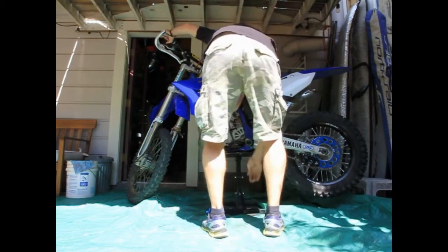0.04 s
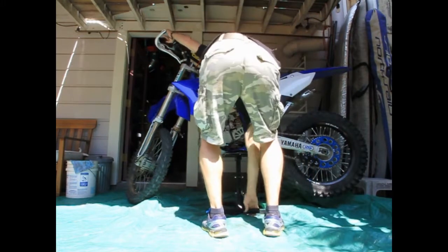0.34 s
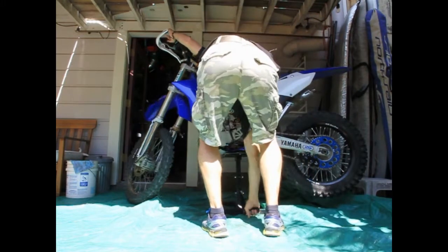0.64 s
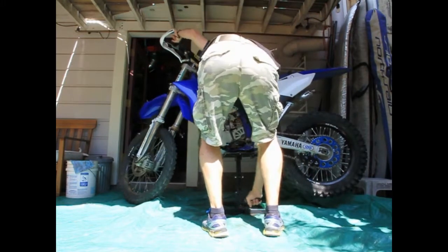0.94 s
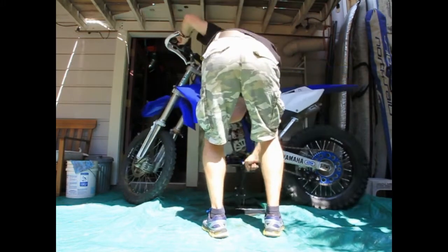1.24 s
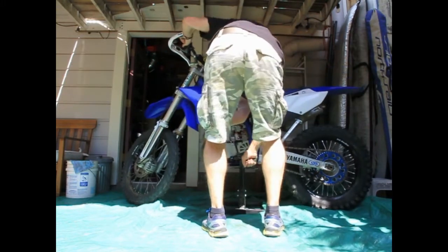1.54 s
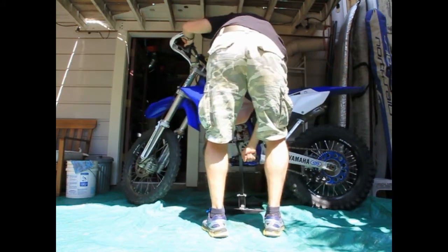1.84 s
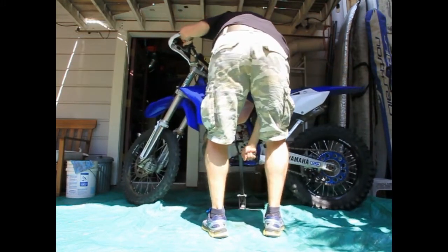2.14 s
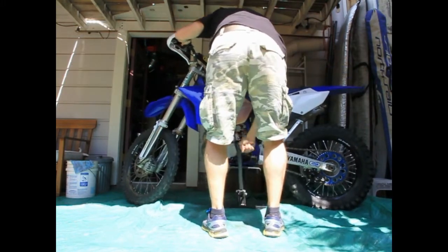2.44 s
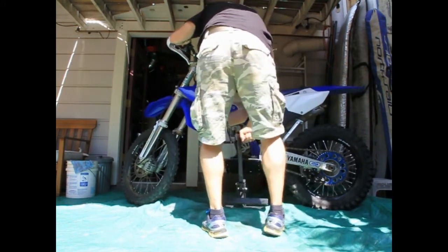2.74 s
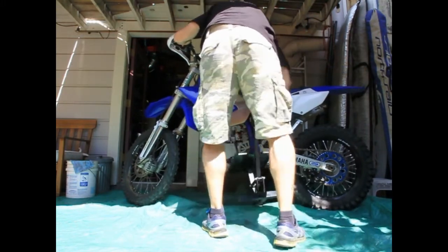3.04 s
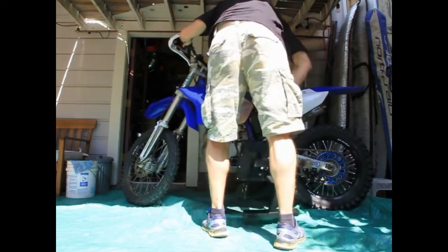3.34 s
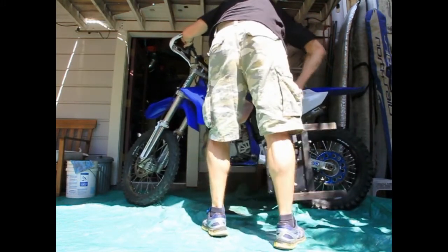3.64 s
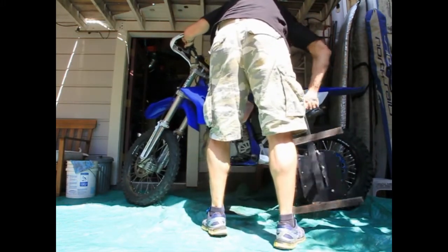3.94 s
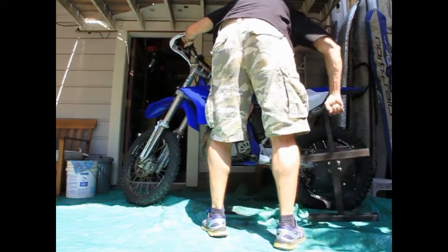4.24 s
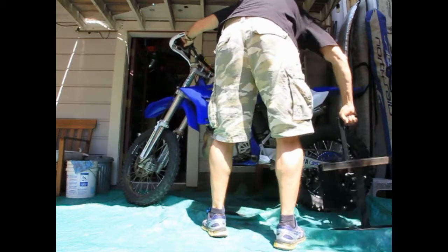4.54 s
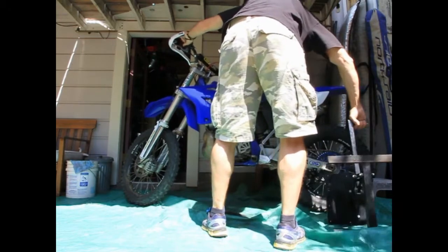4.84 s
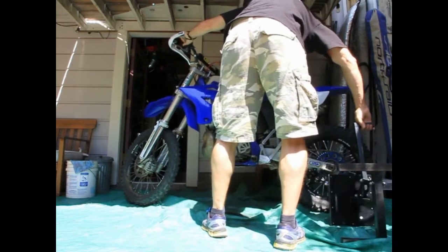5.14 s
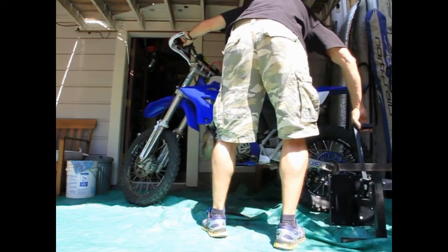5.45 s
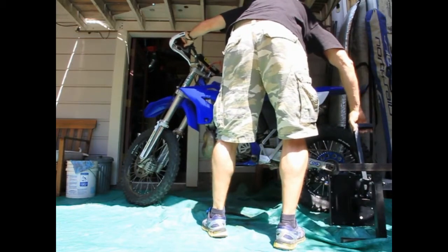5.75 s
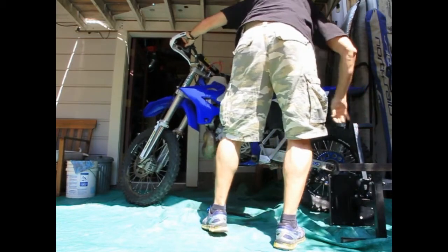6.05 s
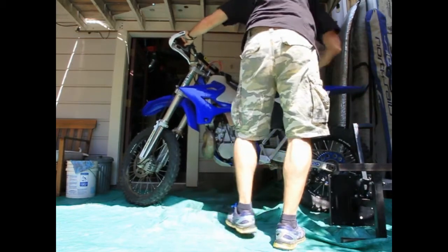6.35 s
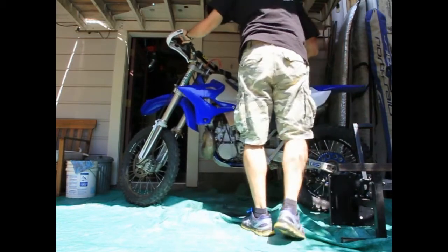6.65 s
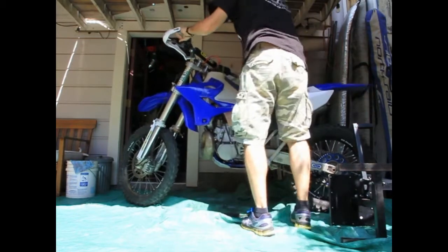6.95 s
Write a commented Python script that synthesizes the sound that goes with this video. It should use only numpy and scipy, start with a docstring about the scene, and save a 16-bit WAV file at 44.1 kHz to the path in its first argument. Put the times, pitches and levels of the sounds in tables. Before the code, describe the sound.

A metal stand clunks and clanks as it is dragged over a plastic tarp and set down, followed by shuffling steps.

```python
"""A steel lift stand is lowered under a dirt bike, dragged out over a plastic tarp, swung aside, set down.
Impacts excite the modes of its frame and loose linkage, which reverberate under a porch roof.
Sliding friction makes its feet scrape and briefly squeal; the tarp hisses and its creases snap.
Shoes then shuffle on the tarp. Throughout, far traffic murmurs; early on there is a steady background
hiss, a distant engine drones at its firing harmonics and a small bird chirps faintly."""
import sys
import numpy as np
from scipy import signal
from scipy.fft import rfft, irfft, next_fast_len
from scipy.io import wavfile
from scipy.ndimage import uniform_filter1d, map_coordinates

SR = 44100
rng = np.random.default_rng(int(sys.argv[2]) if len(sys.argv) > 2 else 0)


def unload_audio(sound):
    """Save the sound as a 16-bit wav file, at the path given as the first command line argument."""
    columns = np.transpose(np.atleast_2d(sound))
    # keep every value between -1 and 1, then stretch to whole-number steps
    steps = np.round(np.clip(columns, -1, 1) * 32767)
    wavfile.write(sys.argv[1], SR, steps.astype(np.int16))


N = 317608
TOP_HZ = 15900
# Spectrum of the hiss, of tarp and background alike. Each row: frequency in Hz, relative level in dB.
HISS_SPECTRUM = [(800, -29), (2000, 3.5), (4000, 9), (7000, 2.5), (13000, 6.5), (16000, -2.5)]


def amp(db):
    """Decibels as an amplitude ratio."""
    return 10 ** (np.asarray(db) / 20)


def unit(x):
    """Normalisation to rms 1."""
    return x / np.sqrt(np.mean(x ** 2) + 1e-20)


def along(points, hz):
    """Interpolation of (Hz, value) points on a logarithmic frequency axis."""
    f, v = np.transpose(points)
    return np.interp(np.log(hz + 1), np.log(f + 1), v)


def curves(rows):
    """Linear interpolation in time: one value per sample for each column after the first."""
    times, *columns = np.transpose(rows)
    return [np.interp(np.arange(N) / SR, times, column) for column in columns]


def during(rows, fade):
    """A gate: 1 within a table's time span, fading to 0 outside it."""
    t = np.arange(N) / SR
    return np.clip(1 + np.minimum(t - rows[0][0], rows[-1][0] - t) / fade, 0, 1)


def wobble(rate):
    """Smooth random modulation with `rate` knots a second."""
    return map_coordinates(rng.standard_normal(int(N * rate / SR) + 4), [np.arange(N) * rate / SR])


def colour(x, spectrum):
    """Spectral shaping by (Hz, dB) points, at rms 1."""
    size = next_fast_len(len(x) + 2048)
    gain = amp(along(spectrum, np.fft.rfftfreq(size, 1 / SR)))
    return unit(irfft(rfft(x, size) * gain, size)[:len(x)])


def add(track, start, sound):
    """Superposition of a sound on the track, from `start` seconds."""
    part = track[max(round(start * SR), 0):][:len(sound)]
    part += sound[:len(part)]


def porch(x, wet_db, build_s=0.00196):
    """Reverberation: reflections from walls and roof decay exponentially, the treble before the bass."""
    # Each row: frequency in Hz, reverberation time (t60) in seconds.
    decay_times = [(100, 0.47), (500, 0.36), (2000, 0.35), (5000, 0.26), (14000, 0.29)]
    hz, t, noise = signal.stft(rng.standard_normal(SR // 2), SR, nperseg=256)
    decay = amp(-60 * t / along(decay_times, hz)[:, None])
    tail = signal.istft(noise * decay * (1 - np.exp(-t / build_s)), SR, nperseg=256)[1]
    return x + amp(wet_db) * signal.fftconvolve(x, tail / np.linalg.norm(tail))[:len(x)]


def air(murmur_db=-47.5, swing_db=1.1):
    """Ambient noise: far traffic sums to a broadband murmur, over a low rumble that swells and ebbs."""
    # Spectra of the two noises. Each row: frequency in Hz, relative level in dB.
    murmur_spectrum = [(20, -14), (70, -30), (125, 0), (300, -5), (400, -3.5), (550, -7.5), (1100, -10.5),
                       (2260, -22), (6000, -29), (13200, -33), (16000, -40)]
    rumble_spectrum = [(15, -18), (35, -5), (55, 9), (85, 3), (120, 2), (250, -47.5)]
    # Envelope of the rumble. Each row: time in seconds, level in dB.
    rumble_levels = [(0.0, -66), (0.94, -58), (1.12, -48.5), (3.61, -59), (4.21, -51), (5.13, -53),
                     (5.73, -56), (6.24, -58), (6.58, -59), (7.2, -56)]
    rumble_db, = curves(rumble_levels)
    murmur = amp(murmur_db + swing_db * wobble(3)) * colour(rng.standard_normal(N), murmur_spectrum)
    return murmur + amp(rumble_db) * colour(rng.standard_normal(N), rumble_spectrum)


def engine(firing_hz=77.75, climb_hz_per_s=2.7, first_db=(-20, -6), third_db=(0, -13), mellow_s=1.75):
    """Periodic firing gives a harmonic series; only the lowest three carry far. It rises and mellows."""
    # Envelope of the second harmonic. Each row: time in seconds, level in dB.
    drone_levels = [(0, -48.5), (.45, -43.5), (.9, -48), (2.2, -45.5), (2.5, -52.5), (3.2, -49),
                    (3.85, -56)]
    t = np.arange(N) / SR
    drone_db, = curves(drone_levels)
    hz = firing_hz + climb_hz_per_s * t
    phase = 2 * np.pi * np.cumsum(hz * (1 + 0.008 * wobble(12.5))) / SR
    first, third = (np.interp(t, [0, mellow_s], ends) for ends in (first_db, third_db))
    harmonics_db = [first + 1.5 * wobble(4), 1.6 * wobble(27), third + 0.93 * wobble(5.9)]
    drone = sum(amp(drone_db + db) * np.sin(k * phase) for k, db in enumerate(harmonics_db, 1))
    return np.sqrt(2) * drone * during(drone_levels, fade=0.24)


def crinkle(spectrum, rate, spread_db, grain_db):
    """Granular noise: a steady rush plus `rate` random impulses a second, of scattered size."""
    clicks, count = np.zeros(N), int(rate * N / SR)
    signs = rng.choice([-1, 1], count)
    sizes = amp(spread_db * np.minimum(rng.exponential(size=count), 4))
    clicks[rng.integers(N, size=count)] = signs * sizes
    return colour(rng.standard_normal(N) + amp(grain_db) * unit(clicks), spectrum)


def hiss_and_drag(scrape_gains_db=(0, -1, 0), hiss_gains_db=(0, 3, -.5), crackle_db=-10):
    """Steady background hiss, with a faint scrape around the first clunks; then sliding friction:
    pulled free and swung aside, the stand judders over the hissing, crackling tarp."""
    # Spectra of scrape and crackle. Each row: frequency in Hz, relative level in dB.
    scrape_spectrum = [(120, -20.5), (200, 2), (300, 1.5), (450, 1.5), (680, 2), (900, -0.5), (1300, -3),
                       (2000, -7), (3300, -9), (4300, -18.5), (6500, -16), (12000, -42.5)]
    crackle_spectrum = [(1000, -13), (3000, 3), (5000, 2), (13000, 2.5), (16000, -6)]
    # Envelopes. Each row: time in seconds, scrape and hiss in dB before the span's gains.
    background = [(0, -51, -54), (.5, -52.5, -56), (.85, -51.5, -54.5), (1.14, -42.5, -56.5),
                  (1.21, -37, -46), (1.5, -47.5, -49), (1.75, -49, -59), (1.94, -49.5, -61.5)]
    pulling = [(1.99, -49.5, -58.5), (2.174, -44, -49), (2.49, -43, -47), (2.558, -34, -45),
               (2.728, -33, -34.5), (2.854, -38, -45), (2.89, -41.5, -44)]
    coming_free = [(3.12, -35, -41), (3.254, -34.5, -34), (3.32, -33, -33.5), (3.44, -46.5, -52),
                   (3.526, -51, -62), (3.55, -47.5, -62)]
    swinging = [(4.35, -51.5, -47.5), (4.44, -43.5, -43.5), (4.61, -36.5, -36), (4.69, -33, -38),
                (4.77, -44, -47), (4.88, -38, -41), (5.04, -37.5, -41.5), (5.12, -44, -47),
                (5.28, -63, -77)]
    spans = (background, np.vstack([pulling, coming_free]), swinging)
    out, flicker = np.zeros(N), wobble(60)
    scrape = amp(0.61 * flicker) * crinkle(scrape_spectrum, rate=430, spread_db=-0.5, grain_db=-6)
    hiss = amp(.5 * flicker) * crinkle(HISS_SPECTRUM, rate=4000, spread_db=2.5, grain_db=-4)
    hiss += amp(crackle_db) * crinkle(crackle_spectrum, rate=110, spread_db=3.5, grain_db=14)
    for span, scrape_gain_db, hiss_gain_db in zip(spans, scrape_gains_db, hiss_gains_db):
        scrape_db, hiss_db = curves(span)
        noise = amp(scrape_db + scrape_gain_db) * scrape + amp(hiss_db + hiss_gain_db) * hiss
        out += noise * during(span, fade=0.042)
    return out


def bird(start_s=.18, period_s=.184, length_s=0.07, start_hz=9200, end_hz=8100, flutter_hz=480):
    """Frequency modulation: random flutter makes six thin, falling chirps buzz; echoes blur them."""
    out, progress = np.zeros(N), np.linspace(0, 1, int(length_s * SR))
    for k, place in enumerate(np.linspace(-1, 1, 6)):
        flutter = unit(uniform_filter1d(rng.standard_normal(len(progress)), size=40))
        hz = start_hz + (end_hz - start_hz) * progress + flutter_hz * flutter
        chirp = np.sin(np.pi * progress) * np.sin(2 * np.pi * np.cumsum(hz) / SR)
        add(out, start_s + k * period_s, amp(-55 - 7 * place ** 2) * chirp)  # loudest in mid-phrase
    return porch(out, wet_db=-1)


def snaps(t60=0.012, gain_db=-8):
    """Buckling: single creases of the tarp flick over; the longer the crease, the lower its snap."""
    # Each row: start in seconds, relative level in dB, spectral peak in Hz.
    creases = [(0.589, -29, 4610), (0.614, -32, 5030), (0.83, -29, 10000), (3.647, -31, 4040),
               (4.1957, -36, 6000), (4.3905, -22, 8600), (4.597, -17.5, 10300), (6.6857, -28, 4040),
               (6.757, -27, 4410), (6.9798, -19, 9880), (7.088, -12, 3740), (7.0935, -16.5, 3240)]
    out, t = np.zeros(N), np.arange(SR // 20) / SR
    for start, db, hz in creases:
        spectrum = [(hz / 4, -26), (hz / 2, -7), (hz, 0), (hz * 2, -10), (hz * 4, -25)]
        add(out, start, amp(db + gain_db - 60 * t / t60) * colour(rng.standard_normal(len(t)), spectrum))
    return porch(out, wet_db=-2.0)


def ringing(hz, db, t60, t):
    """Free vibration: a sum of damped modes, each struck with a random sign, at rms 1."""
    hz, db, t60 = (np.reshape(v, (-1, 1)) for v in (hz, db, t60))
    return unit(rng.choice([-1, 1], len(hz)) @ (amp(db - 60 * t / t60) * np.sin(2 * np.pi * hz * t)))


def contacts(scatter_octaves=0.127):
    """Rebound: a blow may bounce, landing a little elsewhere each time, so its leading modes shift."""
    # Each row: start in seconds, number of contacts, their spacing in seconds, loss per rebound in dB
    # (negative grows), relative thud, knock, clank and jingle levels in dB, leading frame mode in Hz,
    # leading linkage mode in Hz, hardness as a cut-off in Hz.
    clunks = [(0.988, 4, .0125, 0.4, -24, -20.5, -37, -51, 333, 1040, 6000),
              (1.037, 2, 0.0071, 3.5, -56, -29, -31.5, -37.5, 613, 1015, 5960),
              (1.212, 1, .01, 0, -26.5, -17, -29, -39, 520, 1040, 5000),
              (1.222, 3, .0105, 1.5, -32, -20, -24.5, -34.5, 782, 1318, 10000),
              (1.254, 2, .013, 5, -25, -27, -39, -38, 143, 1170, 13000),
              (1.561, 2, .012, 9, -27, -25, -25, -23, 407, 1896, 14900),
              (1.678, 1, .01, 0, -49, -38.5, -44.5, -39, 166, 4220, 6500),
              (1.776, 1, .01, -5, -46, -60, -45.5, -54, 170, 1100, 5000),
              (1.807, 1, .01, 0, -46, -43.5, -43.5, -44.5, 150, 1910, 6460),
              (2.906, 1, .01, 0, -53, -30, -41, -62, 485, 1230, 2000),
              (2.954, 2, .0086, 1.5, -31.5, -16.5, -24.5, -28.5, 440, 1244, 15000),
              (3.001, 1, .01, 0, -26.5, -40, -32, -22, 208, 1280, 15000),
              (3.013, 1, .01, 3, -53, -24, -24, -29, 428, 1250, 15000),
              (3.09, 2, .035, -0.5, -40, -31, -39, -62, 392, 1306, 6000),
              (3.187, 1, .01, 0, -60, -55, -36, -29.5, 476, 3130, 15000),
              (3.225, 1, .01, -4, -59, -56, -30.5, -32.5, 907, 4320, 6000),
              (3.744, 1, .01, 0, -46, -37.5, -32.5, -33.5, 408, 1503, 11950),
              (4.452, 2, .011, 3, -25.5, -15, -25.5, -33.5, 618, 1354, 9500),
              (4.485, 1, .01, 0, -35, -41, -32, -35, 344, 1160, 6960),
              (4.734, 1, .01, 0, -56, -47, -33.5, -45, 830, 1474, 3000),
              (4.781, 1, .01, 0, -58, -39.5, -41.5, -62, 425, 1100, 2500),
              (4.901, 2, .009, -5, -26.5, -28.5, -34.5, -34.5, 160, 1110, 10000),
              (4.93, 3, .017, 3.5, -45, -30, -26, -27.5, 382, 1680, 10000),
              (5.08, 1, .01, 2, -17.5, -14, -24, -43, 361, 1330, 3000),
              (5.086, 2, .005, 7, -30, -19, -44, -27, 560, 1220, 12200),
              (5.123, 1, .01, 0, -30, -26.5, -52, -52, 518, 980, 9000),
              (5.322, 1, .01, 4, -43, -37, -42.5, -54, 480, 1704, 4000)]
    # A rebound shakes the loose parts most. In order: thud, knock, clank and jingle offsets in dB.
    rebound_db = (1.24, -2, 0, 4.1)
    for start, count, gap, loss_db, *levels_db, frame_hz, linkage_hz, cutoff_hz in clunks:
        yield start, levels_db, frame_hz, linkage_hz, cutoff_hz
        for k in range(1, round(count)):
            shift = 2 ** (scatter_octaves * rng.uniform(-1.2, 1, 2))
            bounce_db = np.add(levels_db, rebound_db) - k * loss_db
            yield start + k * gap, bounce_db, frame_hz * shift[0], linkage_hz * shift[1], cutoff_hz


def stand(clatter_t60=0.12, attack_s=0.0006, rattle_db=-31, trims_db=(.3, .3, .3, -1.2)):
    """Impact excitation of modes: where and how hard a contact lands sets the timbre of the steel."""
    # Modes of the stand. Each row: frequency in Hz, relative level in dB, t60 in seconds.
    modes = [(132.7, -11.5, 0.38), (169, 3.5, 0.16), (205, 0.5, 0.15), (297.8, -3, 0.26), (342, 4.5, 0.12),
             (390, 5.5, 0.21), (463, 5, 0.2), (511.5, -13, 0.13), (578.5, 0, 0.159), (628, 6, 0.16),
             (759, 0, 0.12), (946, -14.5, 0.038), (1093, 2, 0.092), (1232, -2.5, 0.15), (1605, -2.5, 0.1),
             (1756, -14, 0.24), (2020, -14, 0.054), (2510, -2.5, 0.2), (2720, -8.5, 0.21),
             (3240, -22.5, 0.08), (4104, -9, 0.11), (4190, -2, 0.21), (4350, -15, 0.21), (5100, -9, 0.12),
             (5420, -17, 0.17), (6060, -5, .12), (7515, -10, 0.23), (8430, -10.5, .12), (8990, -15, 0.097),
             (9700, -20, .12), (12000, -9.5, 0.13)]
    # Spectrum of its dense, short-lived modes. Each row: frequency in Hz, relative level in dB.
    clatter_spectrum = [(50, -43), (90, -8.5), (200, -3), (650, 4.5), (900, -5.5), (1400, -3), (2200, -6.5),
                        (3400, -11.5), (4400, -10.5), (6500, -14), (12500, -15.5), (16000, -22.5)]
    # Bands of thud, knock, clank and jingle. Each row: lower edge in Hz, upper edge in Hz.
    registers = [(75, 260), (260, 1000), (1000, 3500), (3500, 17000)]
    out, t = np.zeros(N), np.arange(SR // 5) / SR
    hz, db, t60 = np.transpose(modes)
    bands = [signal.butter(3, edges, "bandpass", fs=SR, output="sos") for edges in registers]
    for start, levels_db, frame_hz, linkage_hz, cutoff_hz in contacts():
        # the load on the joints detunes the modes from blow to blow
        detuned_hz = hz * (1 + 0.0079 * rng.standard_normal(len(hz)))
        ring = amp(-3) * ringing(detuned_hz, db + rng.normal(0, 1.9, len(hz)), t60, t)
        # modes with an antinode at the contact lead; the linkage's near-equal bars beat
        frame = ringing(frame_hz, db=0, t60=.075, t=t)
        linkage = ringing(linkage_hz * (1 + 0.0188 * rng.standard_normal(3)), db=0, t60=.065, t=t)
        # a light tap does not shake the loose parts, so it rings purer
        purity_db = np.clip(rattle_db - max(levels_db), 0, 10)
        lead = (amp(-3) * frame + amp(-7) * linkage) * amp(purity_db)
        clatter = unit(colour(rng.standard_normal(len(t)), clatter_spectrum) * amp(-60 * t / clatter_t60))
        hit = (clatter + ring + lead) * (1 - np.exp(-t / attack_s))
        # a cushioned contact lasts longer and carries less treble
        hit = signal.lfilter(*signal.butter(2, min(cutoff_hz, TOP_HZ), fs=SR), hit)
        hit = porch(np.pad(hit, (0, len(t))), wet_db=-7)
        for band, level_db, trim_db in zip(bands, levels_db, trims_db):
            part = signal.sosfilt(band, hit)
            onset_rms = np.std(part[:SR // 60])
            add(out, start, amp(level_db + trim_db) * part / onset_rms)
    return out


def squeal(start_s=3.235, flare_s=3.254, end_s=3.33, pitch_hz=9168, flat_hz=190, settle_s=.009):
    """Stick-slip: a steel edge sings at one high resonance, flaring once as the stand comes free."""
    t = np.arange(N) / SR
    age = np.maximum(t - start_s, 0)
    hz = pitch_hz - flat_hz * np.exp(-age / settle_s)
    tone = np.sqrt(2) * np.sin(2 * np.pi * np.cumsum(hz + 25 * wobble(300)) / SR)
    slip = amp(-26 - 170 * age)  # fades at 170 dB a second
    flare = amp(-14) * np.exp(-np.abs(t - flare_s) / 0.0028)
    envelope = (slip + flare) * amp(0.622 * wobble(200)) * during([[start_s], [end_s]], fade=0.0037)
    return porch(tone * envelope, wet_db=-10)


def steps(onset_db=20, release_db_per_s=257):
    """Friction under load: soles scuff and crumple the tarp, swelling as the weight comes on."""
    # Spectrum of a scuffing sole. Each row: frequency in Hz, relative level in dB.
    sole_spectrum = [(80, -10), (250, -1.5), (600, -7), (1500, -4.5), (3500, -12.5), (6000, -12),
                     (12000, -23.5)]
    # Each row: time of full weight, attack and hold in seconds, relative scuff and hiss levels in dB.
    footfalls = [(6.465, 0.031, 0.071, -48.5, -48.5), (6.736, 0.065, 0.0062, -36, -37.5),
                 (6.908, 0.08, 0.09, -38, -39.5), (7.088, 0.01, .005, -40.5, -40),
                 (7.206, 0.043, .02, -51.5, -51)]
    out, t = np.zeros(N), np.arange(N) / SR
    scuff = amp(1 + 1.3 * wobble(60)) * crinkle(sole_spectrum, rate=1100, spread_db=2.2, grain_db=-3)
    hiss = amp(2 * wobble(60)) * crinkle(HISS_SPECTRUM, rate=1500, spread_db=8.0, grain_db=-6)
    for loaded_s, attack, hold, scuff_db, hiss_db in footfalls:
        rise_db = -onset_db * np.maximum(loaded_s - t, 0) / attack
        fall_db = -release_db_per_s * np.maximum(t - loaded_s - hold, 0)
        out += amp(rise_db + fall_db) * (amp(scuff_db) * scuff + amp(hiss_db) * hiss)
    return out


def scene():
    """Superposition: all sources add in one channel."""
    return (stand() + squeal() + hiss_and_drag() + steps() + snaps() + engine() + bird() + air())[None]


def record(dry):
    """Band limiting: an ideal low-pass filter removes everything above TOP_HZ."""
    size = next_fast_len(N + SR // 2)
    passband = np.fft.rfftfreq(size, 1 / SR) < TOP_HZ
    return irfft(rfft(dry, size) * passband, size)[..., :N]


dry = scene()
out = record(dry)
unload_audio(out)
```